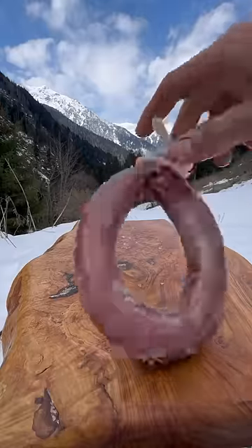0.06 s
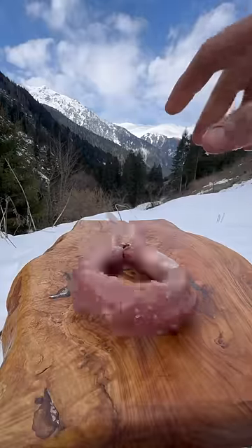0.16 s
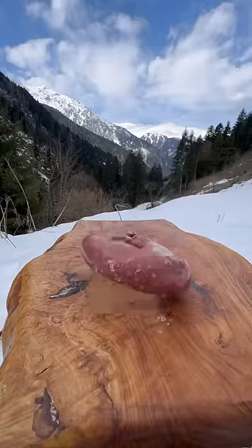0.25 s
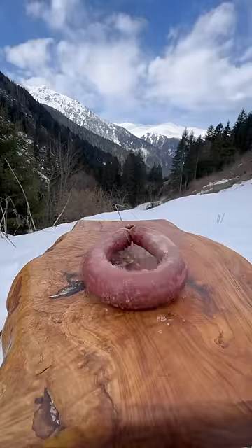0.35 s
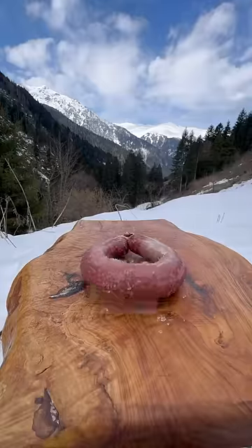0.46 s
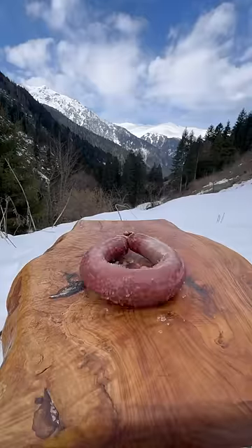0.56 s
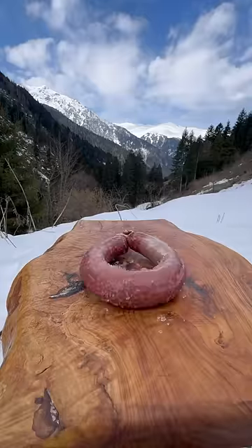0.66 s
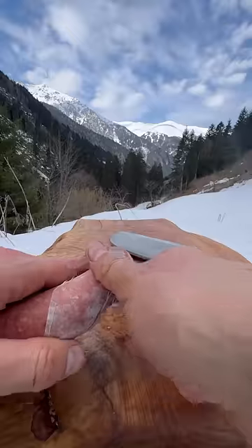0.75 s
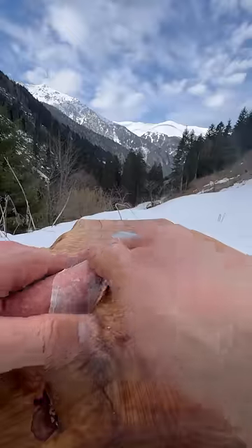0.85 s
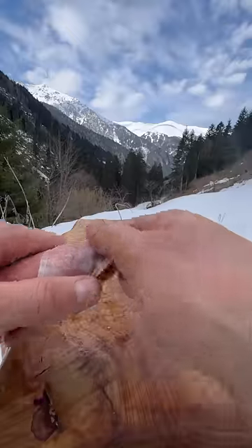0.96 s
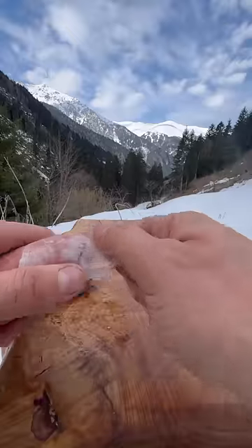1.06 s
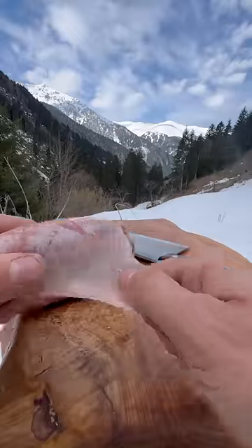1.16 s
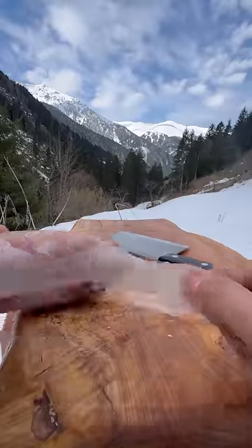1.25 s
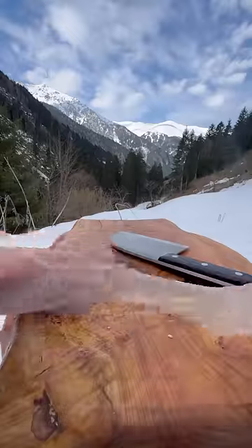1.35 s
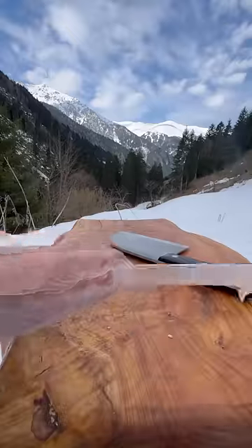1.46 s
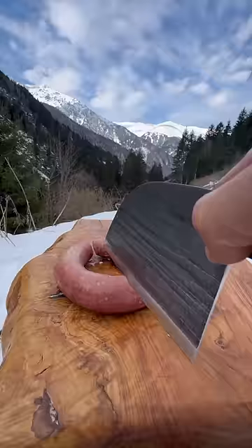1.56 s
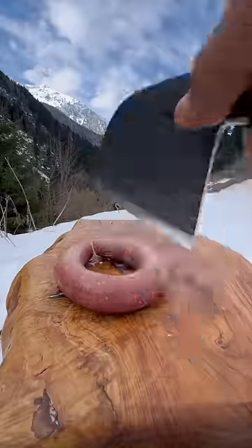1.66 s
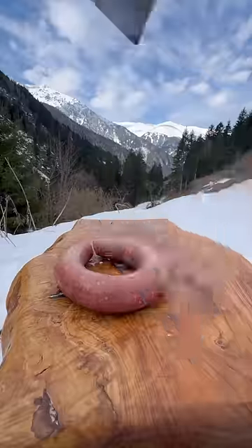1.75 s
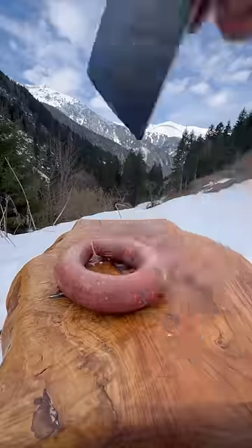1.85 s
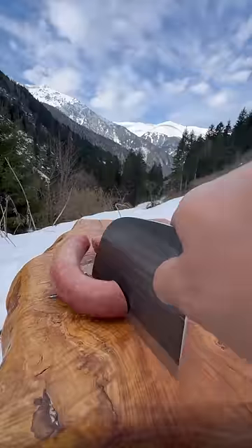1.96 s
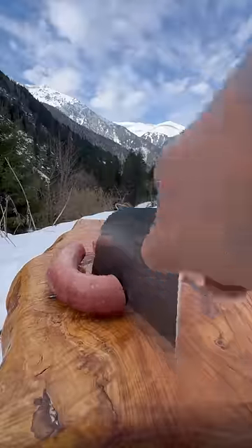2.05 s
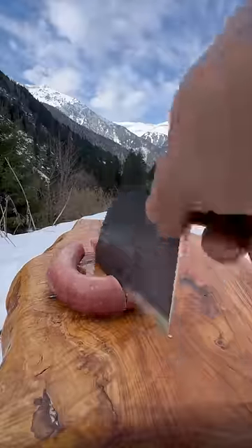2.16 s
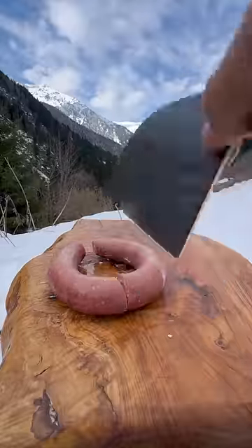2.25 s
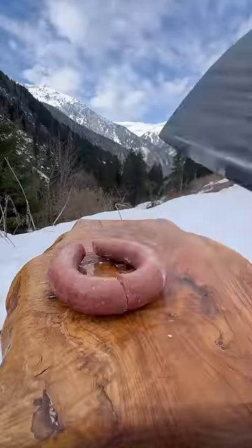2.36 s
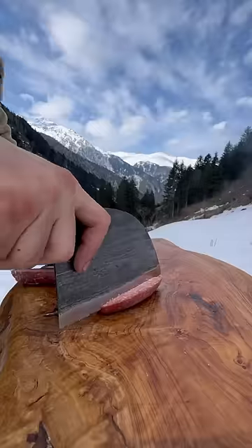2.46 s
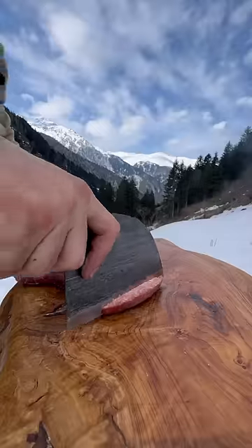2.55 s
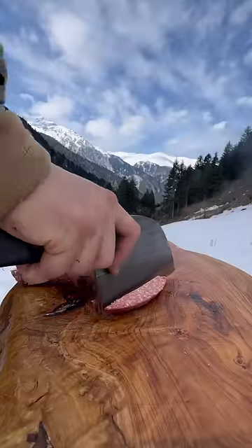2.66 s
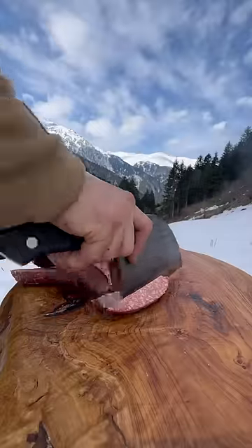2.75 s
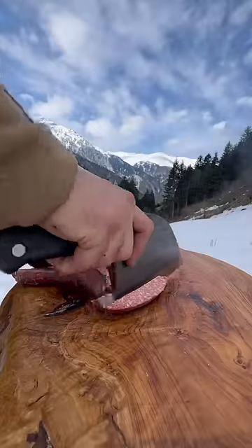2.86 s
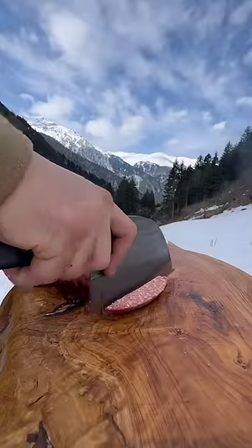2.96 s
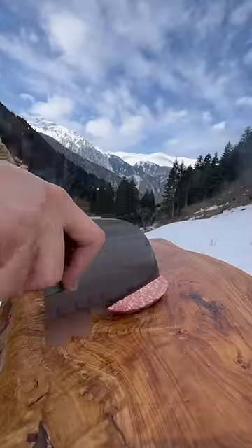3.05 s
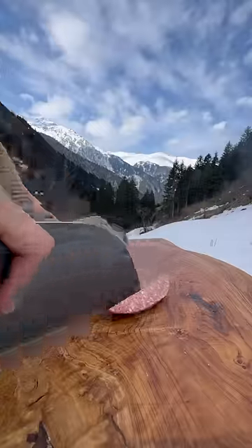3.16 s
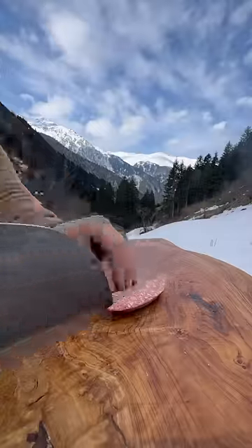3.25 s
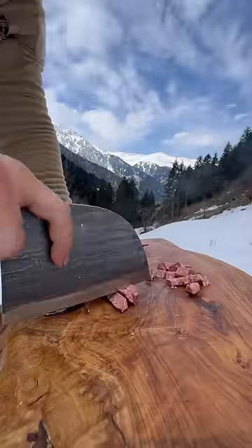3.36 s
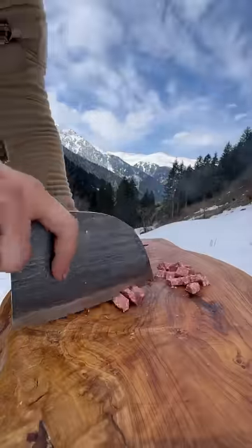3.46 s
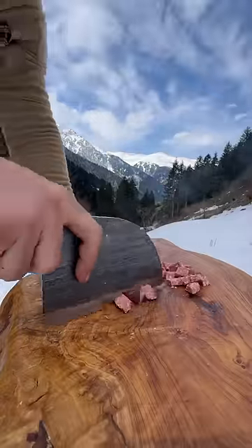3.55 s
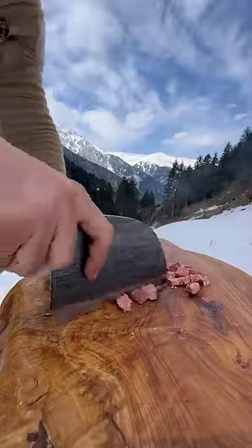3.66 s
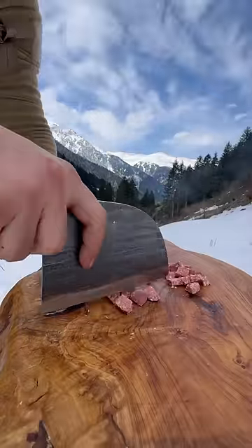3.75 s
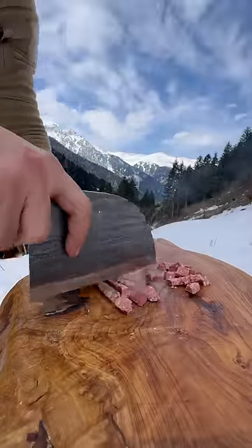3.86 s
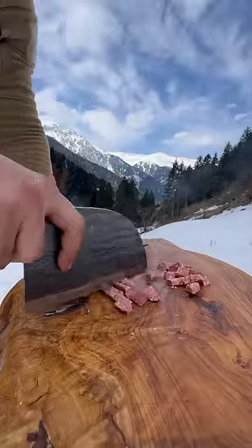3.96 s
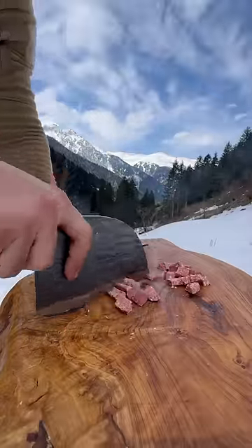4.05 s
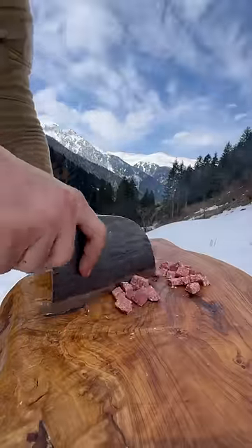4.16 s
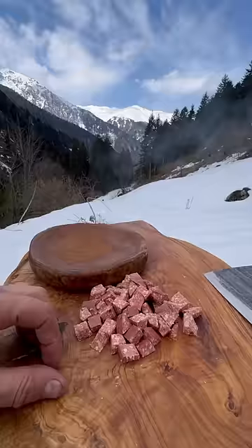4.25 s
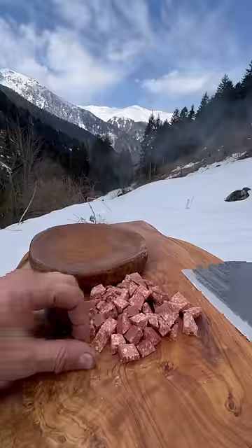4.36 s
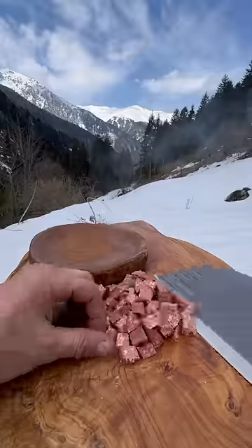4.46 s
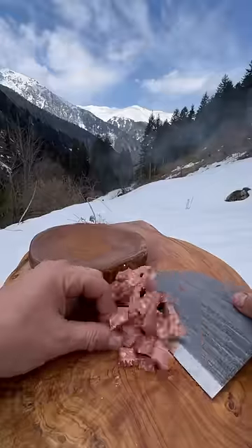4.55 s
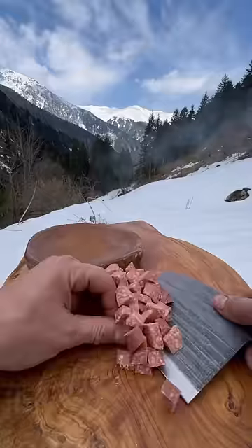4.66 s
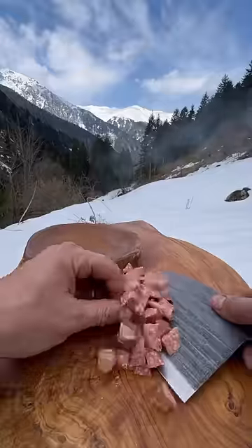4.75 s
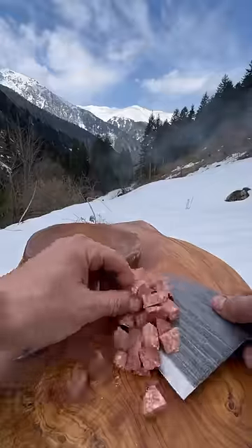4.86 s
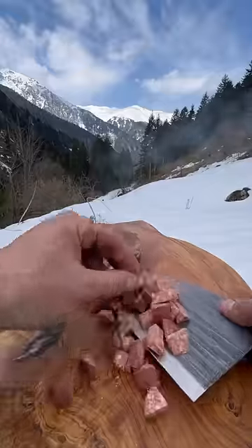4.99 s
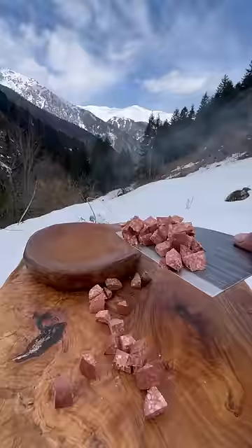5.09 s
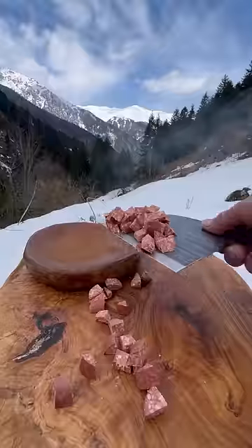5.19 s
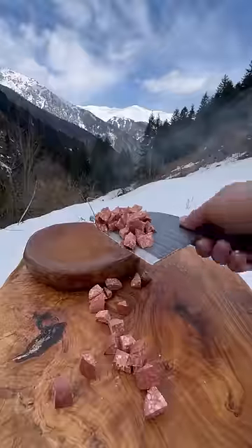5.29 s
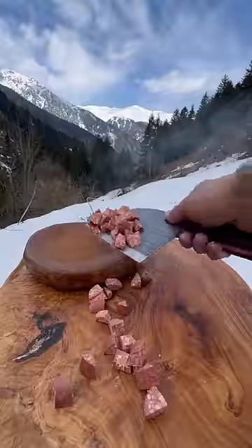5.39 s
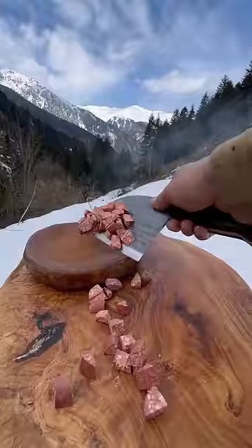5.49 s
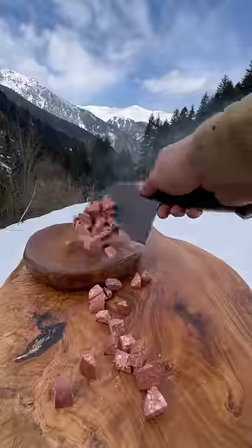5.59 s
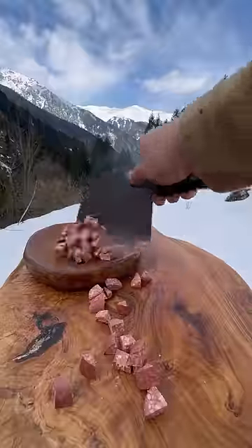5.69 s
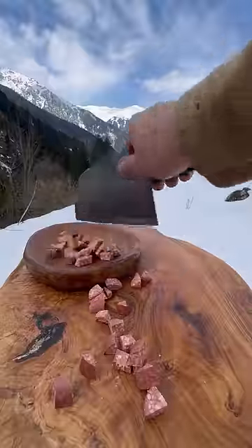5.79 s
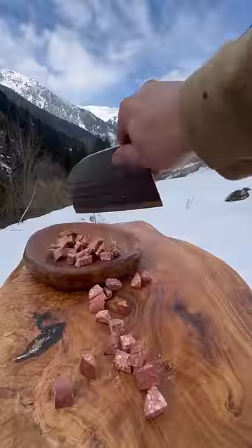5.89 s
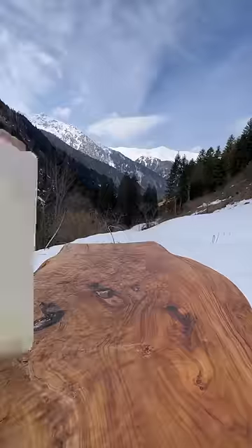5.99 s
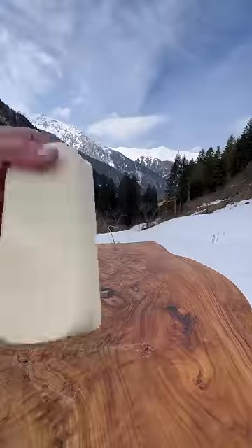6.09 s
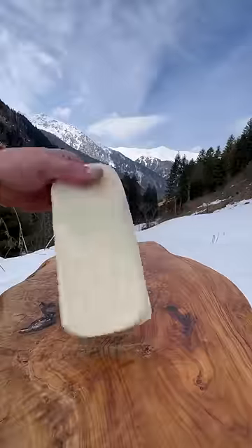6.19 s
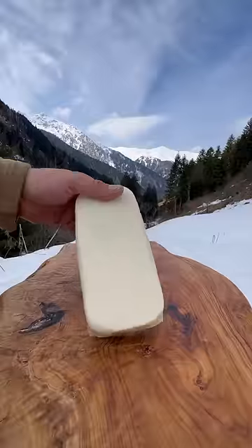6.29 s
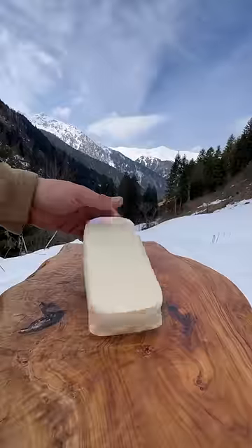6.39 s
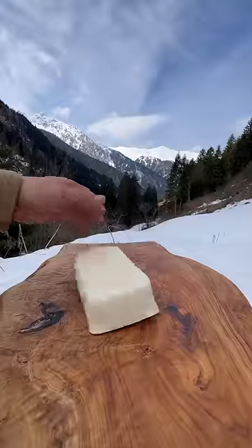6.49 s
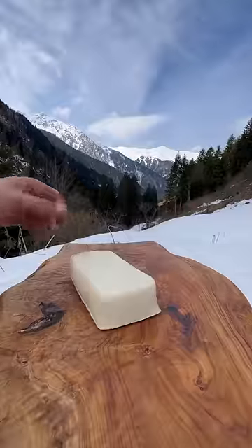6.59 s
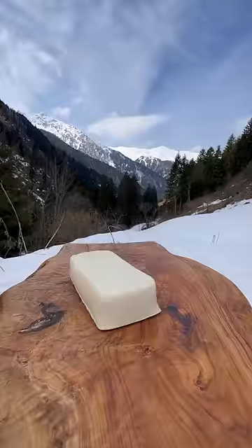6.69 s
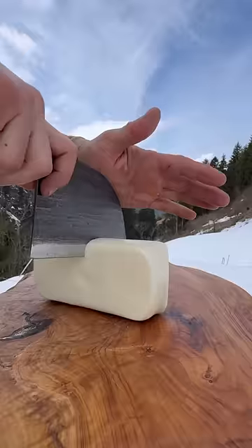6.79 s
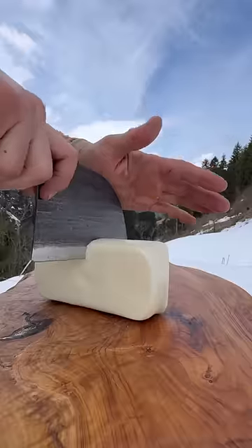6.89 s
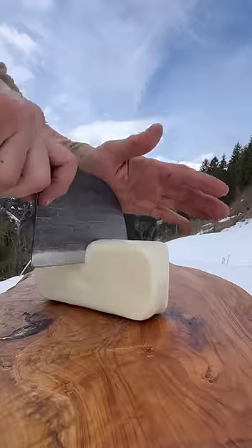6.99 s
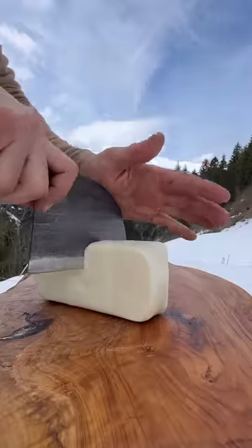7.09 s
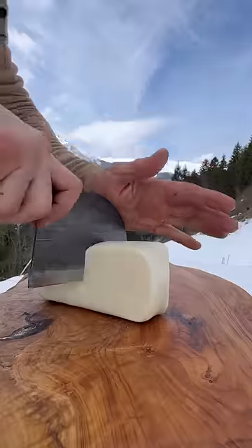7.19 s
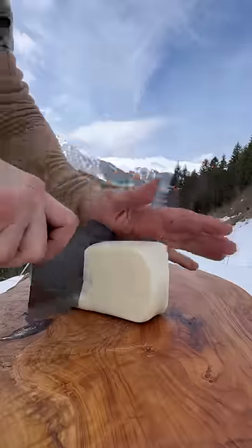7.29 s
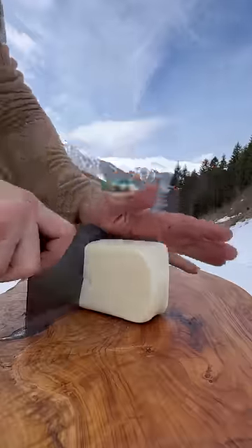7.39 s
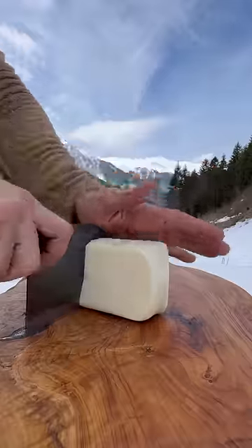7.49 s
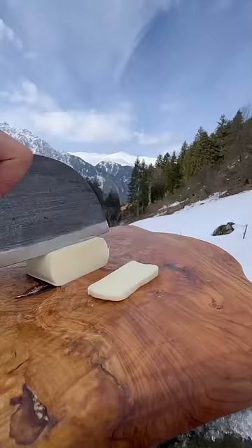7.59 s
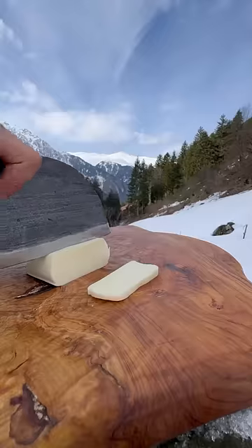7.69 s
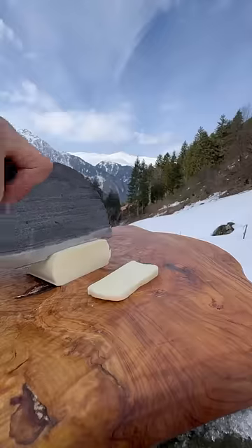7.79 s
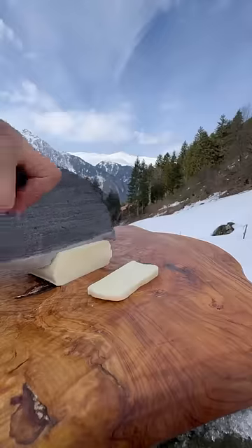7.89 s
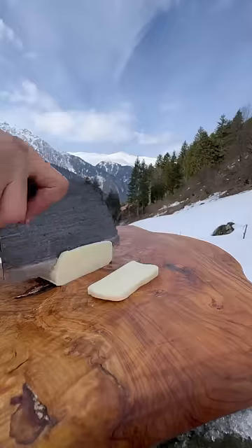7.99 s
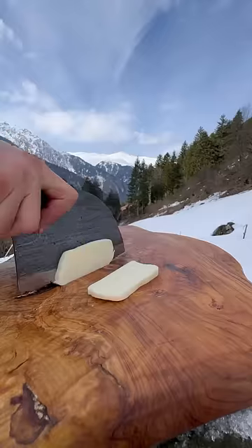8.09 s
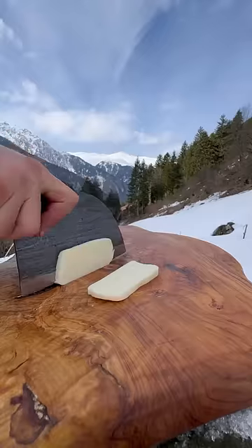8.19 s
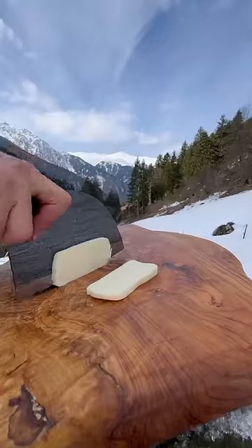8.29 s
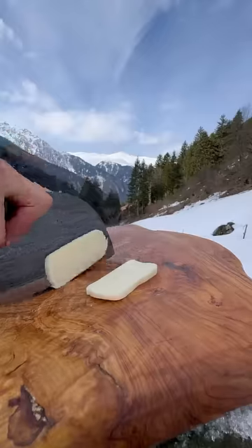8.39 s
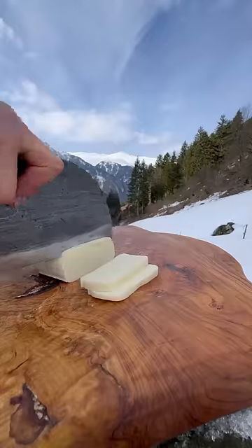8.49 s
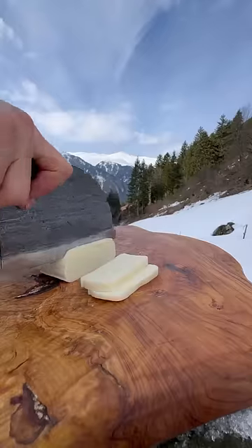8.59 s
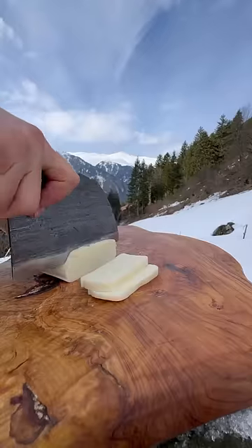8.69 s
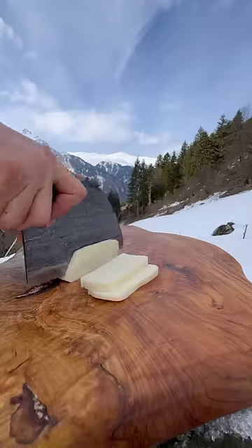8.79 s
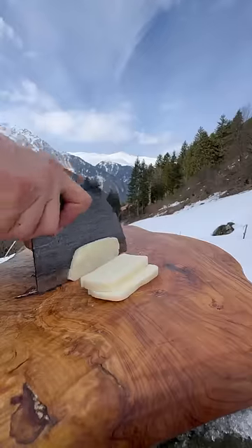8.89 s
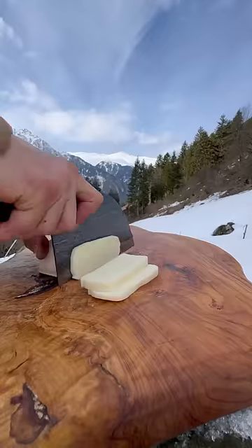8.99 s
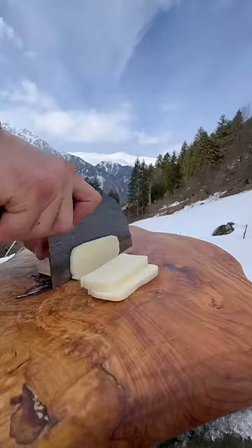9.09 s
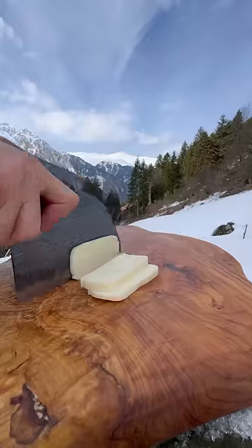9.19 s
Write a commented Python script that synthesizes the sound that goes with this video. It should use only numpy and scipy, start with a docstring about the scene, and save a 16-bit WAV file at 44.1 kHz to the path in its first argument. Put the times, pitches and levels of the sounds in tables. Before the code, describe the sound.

Outdoors, a mountain stream rushes steadily behind close work on a thick wooden slab. Sausage lands with a wet double knock, casing tears away with crisp snaps, then a cleaver crunches through in one hard chop. Lighter knocks, edge scrapes and a short squeal follow; cubes patter dully onto a wooden plate. A block of cheese slaps down and is cut with soft knocks and faint scrapes.

```python
"""A mountain stream rushes from the start, as shaped noise; against it food drops on a thick wooden slab
with wet smacks, pops, knocks and thuds: crackle bursts, decaying sines and struck modes.
A casing is torn off (filtered clicks); a cleaver crunches, knocks, scrapes, squeals and clinks, exciting
resonances of wood and steel; cubes tumble on a plate. The sound, heard outdoors and close to two ports,
falls into short passages: the stream changes level at some, and all but the first fade in quickly."""
import sys
import numpy as np
from scipy import signal
from scipy.fft import rfft, irfft
from scipy.io import wavfile
from scipy.ndimage import uniform_filter1d, minimum_filter1d

SR = 44100
rng = np.random.default_rng(int(sys.argv[2]) if len(sys.argv) > 2 else 0)


def generate_wav(signal):
    """Clip the signal to [-1, 1] and save it as 16-bit WAV at the path in sys.argv[1]."""
    frames = np.transpose(np.atleast_2d(signal))
    scaled = np.clip(frames, -1, 1) * 32767
    pcm = np.round(scaled).astype(np.int16)
    wavfile.write(sys.argv[1], SR, pcm)


N = 407484
TIME = np.arange(N) / SR
BINS = np.fft.rfftfreq(N, 1 / SR)
RING = np.arange(SR // 6) / SR  # time axis of one short sound, s

# passages: [start t/s, relative level of the stream/dB]
PASSAGES = [(0, 5.5), (0.719, 7), (1.56, 7), (2.405, 7), (3.347, 7), (5.124, 7), (5.951, 2.5), (6.776, 5),
            (7.613, 6), (8.515, 6)]
# spectrum of the stream: [f/Hz, relative level per Hz/dB]
STREAM_SPECTRUM = [(25, -21), (65, 3.5), (206, -2), (840, -9), (2690, -18), (6000, -28), (9300, -36),
                   (11000, -56.5)]
# likeness of the stream at left and right: [f/Hz, signed correlation]
STREAM_LIKENESS = [(60, 0.84), (260, 1), (640, -0.39), (1400, 0.35), (6800, 0.045), (12000, -1.12)]
# balance of the stream: [f/Hz, left minus right level/dB]
STREAM_BALANCE = [(180, 2.5), (550, 6.5), (1650, 4), (5000, -0.5)]

# moist skin sticks and lets go: [t/s, peak level/dB, centre f/Hz]
TICKS = [(0.147, -22.5, 10500), (0.3233, -28.5, 2250), (0.337, -19.5, 10400), (0.494, -28, 11500),
         (1.679, -24.5, 11500), (5.248, -37, 3970), (5.4188, -30.5, 4970)]
TICK_S = 0.0034
# food lands on the slab: [t/s, knock level/dB, hardness f/Hz, smack level/dB, smack f/Hz,
# thud level/dB, lag of the weight/s]
LANDINGS = [(0.1601, -13.5, 600, -18, 11000, -32, 0.0076), (0.1726, -7.5, 332, -13, 9700, -29, 0.0051),
            (0.3297, -17, 660, -22, 9000, -29.5, 0.0081), (6.4665, -16.5, 554, -5, 3280, -17.5, 0.0123),
            (6.5766, -23.5, 400, -28, 2760, -25, 0.0056)]
LANDING_REBOUND, LANDING_PLACE_DB = 0.72, 0
# pockets of air trapped under landing food pop: [t/s, level/dB, f/Hz, t60/s]
POPS = [(0.161, -21, 1640, .018), (0.1707, -22, 2380, 0.015), (0.1712, -11.5, 980, 0.023),
        (0.1725, -22.5, 3470, .012), (6.4684, -13.5, 1610, 0.017)]
# modes of the slab: [f/Hz, relative level/dB, t60/s]
SLAB_MODES = [(154, -17, 0.06), (332, -4.5, 0.028), (553.5, 2, 0.029), (675, 1.5, 0.038), (968, 1.5, 0.028),
              (1107, 8, 0.0075), (1404, 11, 0.0032), (1810, -10.5, 0.028), (2110, -4, 0.0097),
              (2710, -19, 0.014)]
# second contact of a blow; share and decay of the contact noise; rise of the contact
REBOUND_S, GRIT, GRIT_S, CONTACT_S = 0.0034, 0.39, 0.0081, 0.0004
WEIGHT_HZ, WEIGHT_LAG_S = 252, 0.00847  # thud of landing food; delay of the push after a crunch
THUD_CYCLES, THUD_SAG_S = 0.31, 0.0076  # decay constant in cycles; time in which the pitch halves
ROCK_HZ, ROCK_DB, ROCK_S = 73.4, -11, 0.011  # the whole slab rocks under a thud

# tugs that strip the casing: [hardest t/s, relative level/dB, rise/(dB/s), fall/(dB/s),
# boom level of the skin/dB, boom f/Hz]
TUGS = [(1.123, -26, 198.5, 240, -27.5, 1110), (1.238, -27.5, 124, 198, -32.5, 516),
        (1.295, -26.5, 235, 60.5, -27, 260), (1.505, -32, 169.5, 407, -48, 900)]
PEEL_START_S, PEEL_END_S, LET_GO_S = 0.98, 1.51, .002
# colour of the tearing: [f/Hz, relative level/dB]
PEEL_COLOUR = [(100, -39), (400, 0.5), (800, 7), (1900, 8.5), (2900, 5.5), (4000, 8), (6000, 6),
               (9000, 8.5), (12000, 2.5), (16000, 4)]
# pitch of the hollow in the stretched casing as it tears: [t/s, f/Hz]
HOLLOW = [(1.115, 2950), (1.155, 2600), (1.33, 3040), (1.5, 2830)]
HOLLOW_WIDTH_HZ, HOLLOW_DB = 930, -13.5
# once the hollow opens, a dark gap rides above its resonance
GAP_RATIO, GAP_WIDTH_HZ, GAP_DB = 1.42, 480, -6.5
# share by which the skin's pitch starts above and ends below its boom pitch, sinking through the tug;
# time scale of the glide; width as a share of the boom pitch
SKIN_SAG, SKIN_GLIDE_S, SKIN_WIDTH = 0.35, 0.079, 0.42
# single strands of the casing snap: [t/s, peak level/dB, centre f/Hz]
SNAPS = [(1.1417, 0, 8200), (1.279, -6.5, 1900), (1.286, -10, 1700), (1.358, -11.5, 2200),
         (1.4414, -6, 6100), (1.4822, -3, 5700), (1.488, -15.5, 1880), (1.502, -7.5, 6140)]

# food gives way under the blade: [t/s, crunch level/dB, length/s, crunch f/Hz, thud level/dB, thud f/Hz]
CRUSHES = [(1.9319, -7, 0.023, 3080, -13, 346), (4.473, -21.5, 0.031, 3450, -19.5, 285),
           (7.332, -22.5, 0.015, 2330, -24.5, 121)]
# the cleaver meets the slab: [t/s, peak level/dB, hardness f/Hz, rebound as a share of the blow,
# level that the place of the blow gives the middle modes/dB]
CHOPS = [(1.9465, 10.5, 2540, .02, 6.5), (1.997, -15, 890, 0.51, -15), (2.5953, -10.5, 1060, 0.29, 1.5),
         (3.5099, -6, 880, 0.45, -3.5), (4.0684, -1.5, 950, 0.57, 3.5), (7.313, -5.5, 920, 0.04, -19),
         (7.3371, -16.5, 2600, 0.13, -4), (7.494, -34.5, 3500, .1, 12), (8.1374, -29, 800, 0.49, 1),
         (8.8848, -15.5, 1400, 0.26, 1.5)]

# the edge dragged over the wood: [start t/s, hardest t/s, end t/s, body level/dB, treble level/dB]
STROKES = [(2.602, 2.65, 2.79, -42.5, -39), (2.841, 3.116, 3.48, -45.5, -37.5),
           (3.506, 3.517, 3.63, -41, -47.5), (4.071, 4.107, 4.17, -47, -46.5),
           (4.296, 4.472, 4.53, -32.5, -41), (4.495, 4.558, 4.64, -32, -43),
           (8.307, 8.414, 8.52, -53.5, -47), (8.933, 8.975, 9.04, -45.5, -45),
           (9.08, 9.187, 9.32, -48.5, -42)]
STROKE_RISE_DB, STROKE_FALL_DB, STROKE_CURVE = 9, 19.5, 1.85  # pressure builds and eases off
# bands in which the blade rings when pressed on the wood: [f/Hz, width/Hz, relative level/dB]
PRESSED_BANDS = [(273, 56, -2.5), (1013, 62, 0), (1734, 260, -1), (2110, 740, -2.5), (2610, 210, -3.5),
                 (2884, 144, -3.5), (3370, 150, -13.5), (4050, 225, -9.5), (5586, 440, -7), (7280, 740, -5),
                 (9020, 1000, -2.5), (9950, 530, -10.5), (14600, 1570, -5)]
# partials sliding through each band: typical rate, reach in band widths, width
SWEEPS_PER_S, SWEEP_WIDTHS, PARTIAL_HZ = 5.5, 1.26, 90
BAND_DB, HISS_DB = 1, -6  # noise of each whole band; broad noise around the bands
# one resonance of the blade squeals: [loudest t/s, swell/s, level/dB, f/Hz, glide/(Hz/s)]
SQUEALS = [(2.939, 0.028, -45.5, 2960, -2500), (3.115, 0.034, -41, 1120, -900),
           (3.11, 0.035, -43, 4140, 2500), (3.14, .025, -45, 9470, 0), (3.159, .02, -41, 1990, -4000),
           (3.18, 0.019, -42, 3000, 3500), (3.205, .016, -41, 8770, -19000),
           (3.55, .025, -46.5, 2870, -2200), (3.555, .028, -57, 4290, -1500),
           (4.115, .012, -43, 1930, -1000), (4.317, .01, -38, 3890, 0), (4.351, 0.012, -29.5, 965, 2400),
           (4.385, 0.024, -32, 1773, -3200), (4.41, .024, -35, 1036, 2), (4.422, 0.015, -25.5, 2844, 4000),
           (4.435, .018, -39, 303, 600), (4.454, 0.016, -33, 2640, -4000), (8.4, 0.021, -53, 3750, -2500),
           (9.186, .035, -48.5, 2810, -3000)]

# the blade struck: [t/s, ring peak level/dB, most excited f/Hz, spread/octaves, scratch level/dB]
CLINKS = [(3.89, -20.5, 4000, 1.3, -12), (7.495, -28.5, 3950, 0.0092, -26.5)]
# modes of the struck blade: [f/Hz, relative level/dB, t60/s]
BLADE_MODES = [(1480, 2, 0.024), (2470, -4, 0.087), (3500, 3, 0.03), (3950, -29, 0.069), (4690, -9, 0.061),
               (6050, -7, 0.079), (8440, -11, .04)]
# diced sausage tumbles off the blade onto a wooden plate: [t/s, peak level/dB]
CUBES = [(5.6195, -27.5), (5.6365, -20), (5.645, -28.5), (5.765, -28)]
# modes of the plate: [f/Hz, relative level/dB, t60/s]
PLATE_MODES = [(370, -5.5, 0.053), (688, -3, 0.058), (1465, 1, 0.021)]

# the two ports for near sounds: [f/Hz, left phase lead/rad, left minus right level/dB]
PORTS = [(200, 0, 2), (580, .35, 2.5), (1000, .25, -.5), (1900, -.1, -.3), (3200, -.5, -.5),
         (4700, -1.3, 3), (6500, -1.6, 1), (8000, -2, .5), (9000, -1.7, .3), (11500, -3, 0),
         (15000, -3.8, 0)]
HOLD_S, EDGE_HZ = .11, 16300  # hold of the gain control; upper band limit


def amp(db):
    """Level to amplitude ratio: 20 dB for each factor of ten."""
    return 10 ** (np.asarray(db) / 20)


def evened(x):
    """Normalises mean power: rms becomes 1."""
    return x / np.sqrt(np.mean(x ** 2) + 1e-20)


def peaked(x, db):
    """Normalises the peak amplitude to a given level."""
    return amp(db) * x / (abs(x).max() + 1e-12)


def read(points, hz, axis=1):
    """Interpolates a column of a table linearly along log frequency."""
    table = np.array(points, float)
    return np.interp(np.log(hz + 1), np.log(table[:, 0] + 1), table[:, axis])


def add(mix, s, sound):
    """Superposition: adds a sound to the mix at time s."""
    part = mix[max(round(s * SR), 0):][:len(sound)]
    part += sound[:len(part)]


def passed(x, hz, kind, order=2):
    """Butterworth filtering: low-, high- or band-pass."""
    hz = np.clip(hz, 10, .48 * SR)
    return signal.sosfilt(signal.butter(order, hz, kind, fs=SR, output="sos"), x)


def wander(count, rate_hz):
    """Low-passed noise: slow random motion of rms 1."""
    settle = SR // 2
    return evened(passed(rng.standard_normal(count + settle), rate_hz, "low")[settle:])


def resonate(x, hz, width):
    """Heterodyning: a steep-skirted resonance, made at zero frequency, follows the curve hz."""
    turn = np.exp(2j * np.pi * np.cumsum(hz) / SR)
    r = np.exp(-np.pi * abs(width) / SR)
    return (turn * signal.lfilter([(1 - r) ** 2], [1, -2 * r, r * r], x / turn)).real


def grains(count, per_s, spread_db):
    """Random impulses: tiny clicks at random moments, a few of them large."""
    size = amp(spread_db * np.minimum(rng.exponential(1, count), 4))
    sign = rng.choice([-1, 1], count)
    return evened(size * sign * (rng.random(count) < per_s / SR))


def stream(level_db=-48.5, swell_db=1.37):
    """Partially correlated noise: a far rush, louder or softer in some passages, swelling throughout."""
    one, other = rfft(rng.standard_normal((2, N)))
    same = np.clip(read(STREAM_LIKENESS, BINS), -.95, .99)
    side_db = read(STREAM_BALANCE, BINS) / 2
    left = one * amp(side_db)
    right = (same * one + np.sqrt(1 - same ** 2) * other) * amp(-side_db)
    colour = amp(read(STREAM_SPECTRUM, BINS)) / np.sqrt(1 + same)
    rush = evened(irfft(np.array([left, right]) * colour, N))
    start, passage_db = np.transpose(PASSAGES)
    now_db = passage_db[np.searchsorted(start[1:], TIME)]
    return rush * amp(level_db + now_db + swell_db * wander(N, 7))


def crackle(shape, db, hz, band=1.92, body_db=-18, body_low_hz=220, body_hz=2500):
    """Band-limited noise burst: crackle around hz with a second, body band mixed in."""
    burst = rng.standard_normal(len(shape)) * shape
    body = passed(burst, [body_low_hz, body_hz], "band")
    return peaked(passed(burst, [hz / band, hz * band], "band") + amp(body_db) * body, db)


def smack(db, length, hz):
    """Brief surface contact: a quick crackle as two surfaces meet or part."""
    u = RING / length
    return crackle(np.sqrt(u) * np.exp(-2 * u), db, hz)


def knock(db, hard_hz, rebound, place_db, middle_hz=1000, middle_span=0.24):
    """Modal impact: soft contact weakens upper modes, a blow on a node the middle ones; it lands twice."""
    ring = GRIT * rng.standard_normal(len(RING)) * np.exp(-RING / GRIT_S)
    for k, (hz, level, t60) in enumerate(SLAB_MODES):
        middle = np.exp(-(np.log(hz / middle_hz) / middle_span) ** 2)
        decay = amp(level + place_db * middle - 60 * RING / t60)
        ring = ring + (-1) ** k * decay * np.sin(2 * np.pi * hz * RING)
    blow = passed(ring * (1 - np.exp(-RING / CONTACT_S)), hard_hz, "low", order=1)
    add(blow, REBOUND_S, rebound * passed(blow, hard_hz, "low", order=1))
    return peaked(blow, db)


def thud(db, hz):
    """Damped oscillation: a low push sinks in pitch as soft weight settles, and the slab rocks."""
    turns = np.cumsum(hz / (1 + RING / THUD_SAG_S)) / SR
    push = np.sin(2 * np.pi * turns) * turns * np.exp(-turns / THUD_CYCLES)
    rock = np.sin(2 * np.pi * ROCK_HZ * RING) * RING * np.exp(-RING / ROCK_S)
    return peaked(passed(push, 70, "high"), db) + peaked(rock, db + ROCK_DB)


def landings(smack_s=0.002):
    """Contact and cavity resonance: skin smacks or ticks, air pops, the slab knocks, weight follows."""
    out = np.zeros(N)
    for s, db, hard_hz, smack_db, smack_hz, thud_db, lag in LANDINGS:
        add(out, s, smack(smack_db, smack_s, smack_hz))
        add(out, s, knock(db, hard_hz, LANDING_REBOUND, LANDING_PLACE_DB))
        add(out, s + lag, thud(thud_db, WEIGHT_HZ))
    for s, db, hz, t60 in POPS:
        decay = amp(db - 60 * RING / t60)
        add(out, s, decay * np.sin(2 * np.pi * hz * RING) * (1 - np.exp(-RING / CONTACT_S)))
    for s, db, hz in TICKS:
        add(out, s, smack(db, TICK_S, hz))
    return out


def peel(level_db=8.5, fibres_per_s=7000, size_spread_db=3.0, patchy_db=2.2, snap_s=0.001,
         grip_s=0.022, rip_db=3.0, rip_hz=100):
    """Fracture noise: fibres part evenly, then in separate rips; the slackening skin booms."""
    t = np.arange(PEEL_START_S, PEEL_END_S + 10 * LET_GO_S, 1 / SR)
    tear_power = boom = 0
    for s, db, rise, fall, boom_db, boom_hz in TUGS:
        effort_db = np.minimum(rise * (t - s), fall * (s - t))
        tear_power = tear_power + amp(db + effort_db) ** 2
        skin_hz = boom_hz * (1 - SKIN_SAG * np.tanh((t - s) / SKIN_GLIDE_S))
        skin = evened(resonate(rng.standard_normal(len(t)), skin_hz, SKIN_WIDTH * boom_hz))
        boom = boom + amp(boom_db + effort_db) * skin
    rips_db = rip_db * np.linspace(0, 1, len(t)) * wander(len(t), rip_hz)
    fibres = grains(len(t), fibres_per_s, size_spread_db) * amp(rips_db)
    # colour the fibres frame by frame, with the gap and random patches
    hz, frame_s, spectra = signal.stft(fibres, SR, nperseg=256)
    frame_s = t[0] + frame_s
    hollow_hz = np.interp(t, *np.transpose(HOLLOW))
    gap_hz = GAP_RATIO * np.interp(frame_s, t, hollow_hz)
    gap = (frame_s > HOLLOW[1][0]) * np.exp(-((hz[:, None] - gap_hz) / GAP_WIDTH_HZ) ** 2)
    patches = uniform_filter1d(rng.standard_normal(spectra.shape), size=4, axis=0)
    patches = evened(uniform_filter1d(patches, size=12, axis=1))
    colour_db = read(PEEL_COLOUR, hz)[:, None] + GAP_DB * gap + patchy_db * patches
    tear = evened(signal.istft(spectra * amp(colour_db))[1][:len(t)])
    hollow = evened(resonate(fibres, hollow_hz, HOLLOW_WIDTH_HZ))
    tear = evened(tear + amp(HOLLOW_DB) * (t > HOLLOW[0][0]) * hollow)
    gripped = np.minimum((t - PEEL_START_S) / grip_s, 1)
    gripped = gripped * np.exp(-np.maximum(t - PEEL_END_S, 0) / LET_GO_S)
    out = np.zeros(N)
    add(out, PEEL_START_S, gripped * (amp(level_db) * tear * np.sqrt(tear_power) + boom))
    for s, db, snap_hz in SNAPS:
        add(out, s, smack(db, snap_s, snap_hz))
    return out


def chops():
    """Crushing and impact: the cleaver crunches through food, pushes it down and knocks on the slab."""
    out = np.zeros(N)
    for s, db, hard_hz, rebound, place_db in CHOPS:
        add(out, s, knock(db, hard_hz, rebound, place_db))
    for s, db, length, hz, thud_db, thud_hz in CRUSHES:
        shape = np.exp(-(RING / length) ** 4)
        add(out, s, crackle(shape, db, hz, band=5.0, body_db=7.0, body_hz=2130))
        add(out, s + WEIGHT_LAG_S, thud(thud_db, thud_hz))
    return out


def partial(rub, hz, width, direction):
    """Moving resonance: one narrow partial after another slides up or down through a blade band."""
    rate = SWEEPS_PER_S * np.exp(.5 * wander(len(rub), SWEEPS_PER_S))
    sweep = (rng.random() + np.cumsum(rate) / SR) % 1
    partial_hz = hz + direction * SWEEP_WIDTHS * width * (sweep - .5)
    return evened(np.sin(np.pi * sweep) ** 2 * resonate(rub, partial_hz, PARTIAL_HZ))


def scrapes(chatter_db=1.0, chatter_hz=70, split_hz=3800, turn_db=3.0):
    """Stick-slip friction: as the bearing point moves, one part of the blade shortens, the other lengthens."""
    out = np.zeros(N)
    for start, hardest, end, body_db, treble_db in STROKES:
        stop = min([end] + [s for s, _ in PASSAGES if s > start])  # a new passage ends the stroke
        t = np.arange(start, stop, 1 / SR)
        ease = np.interp(t, [start, hardest, end], [1, 0, 1]) ** STROKE_CURVE
        ease_db = ease * np.where(t < hardest, STROKE_RISE_DB, STROKE_FALL_DB)
        pressure = amp(chatter_db * wander(len(t), chatter_hz) - ease_db)
        rub = grains(len(t), 9000, 4.0)  # the wood grain catches the edge
        steel = 0
        for hz, width, db in PRESSED_BANDS:
            band = partial(rub, hz, width, 0.94) + partial(rub, hz, width, -0.994)
            band = band + amp(BAND_DB) * evened(resonate(rub, np.full(len(t), hz), 2 * width))
            steel = steel + amp(db) * evened(band * amp(turn_db * wander(len(t), 20.6)))
        hiss = evened(passed(rub, [900, 8000], "band", order=1))
        sound = evened(steel) + amp(HISS_DB) * hiss
        body = evened(passed(sound, split_hz, "low", order=4))
        treble = evened(passed(sound, split_hz, "high", order=4))
        scrape = (amp(body_db) * body + amp(treble_db) * treble) * pressure
        add(out, start, scrape * signal.windows.tukey(len(t), .04))
    return out


def squeals(jitter_hz=30, rough_db=4.0, rough_rate_hz=130):
    """Mode locking: stick-slip holds one resonance, which swells, glides and dies away roughly."""
    out = np.zeros(N)
    for s, swell, db, hz, glide in SQUEALS:
        t = np.arange(-4 * swell, 4 * swell, 1 / SR)
        pitch_hz = hz + glide * t + jitter_hz * wander(len(t), rough_rate_hz)
        turns = np.cumsum(pitch_hz) / SR
        tone = evened(np.sin(2 * np.pi * turns) * amp(rough_db * wander(len(t), rough_rate_hz)))
        add(out, s + t[0], amp(db) * tone / np.cosh(t / swell) * signal.windows.tukey(len(t), .5))
    return out


def clinks(scratch_s=0.0053, scratch_hz=3600):
    """Selective modal excitation: a scratch rings the steel; the place of touch picks out some modes."""
    out = np.zeros(N)
    for s, db, centre, spread, scratch_db in CLINKS:
        ring = 0
        for hz, level, t60 in BLADE_MODES:
            mode = amp(level - 60 * RING / t60) * np.sin(2 * np.pi * (hz * RING + rng.random()))
            ring = ring + mode / (1 + (np.log2(hz / centre) / spread) ** 2)
        add(out, s, peaked(ring * (1 - np.exp(-RING / 0.00089)), db))
        add(out, s, smack(scratch_db, scratch_s, scratch_hz))
    return out


def cubes(soft_hz=2200, squash_s=0.0035):
    """Soft impact: cubes squash against the plate, whose modes ring dully under a low-pass."""
    out = np.zeros(N)
    for s, db in CUBES:
        ring = 0
        for hz, level, t60 in PLATE_MODES:
            phase = 2 * np.pi * (hz * RING + rng.random())
            ring = ring + amp(level - 60 * RING / t60) * np.sin(phase)
        squash = 2 * rng.standard_normal(len(RING)) * np.exp(-RING / squash_s)
        add(out, s, peaked(passed(ring + squash, soft_hz, "low"), db))
    return out


def near(x, scatter_db=-16, scatter_t60=0.012):
    """Near-field differences: phase and level differ at the ports; slab, hands and blade scatter faintly."""
    turn = amp(read(PORTS, BINS, axis=2) / 2) * np.exp(.5j * read(PORTS, BINS))
    direct = irfft(rfft(x) * np.array([turn, 1 / turn]), N)
    taps = rng.standard_normal((2, len(RING))) * amp(-60 * RING / scatter_t60)
    taps = passed(taps / np.linalg.norm(taps[0]), 3600, "high", order=1)
    return direct + amp(scatter_db) * signal.oaconvolve(x[None], taps, axes=1)[:, :N]


def scene():
    """Superposition: the near work on the slab in front of the far stream."""
    work = landings() + peel() + chops() + scrapes() + squeals() + clinks() + cubes()
    return stream() + near(work)


def record(dry, threshold_db=-8, recover_db_per_s=130, cut_db=-17, fade_s=0.017):
    """Gain control and clipping: excess power is ducked, held and released; passages fade in; band limit."""
    keep = np.exp(-1 / (.006 * SR))  # power averaged over 6 ms
    power = signal.lfilter([1 - keep], [1, -keep], (dry ** 2).mean(0))
    excess_db = np.maximum(10 * np.log10(power + 1e-12) - threshold_db, 0)
    half = int(HOLD_S * SR / 2)
    held_db = -minimum_filter1d(-excess_db, 2 * half + 1, origin=half)  # running maximum
    fall = recover_db_per_s * TIME
    gain_db = fall - np.maximum.accumulate(held_db + fall)
    ducked = np.clip(dry * amp(gain_db), -1, 1)
    fade_db = 0
    for s, _ in PASSAGES[1:]:
        fade_db = fade_db + cut_db * (TIME >= s) * np.exp(-((TIME - s) / fade_s) ** 2)
    faded = ducked * uniform_filter1d(amp(fade_db), size=64)
    band_limit = signal.firwin(511, EDGE_HZ, window=("kaiser", 9), fs=SR)
    return signal.oaconvolve(faded, band_limit[None], "same")


dry = scene()
out = record(dry)
generate_wav(out)
```